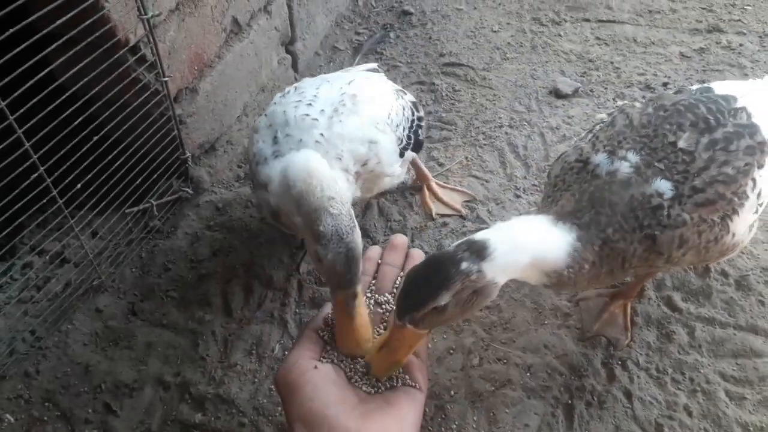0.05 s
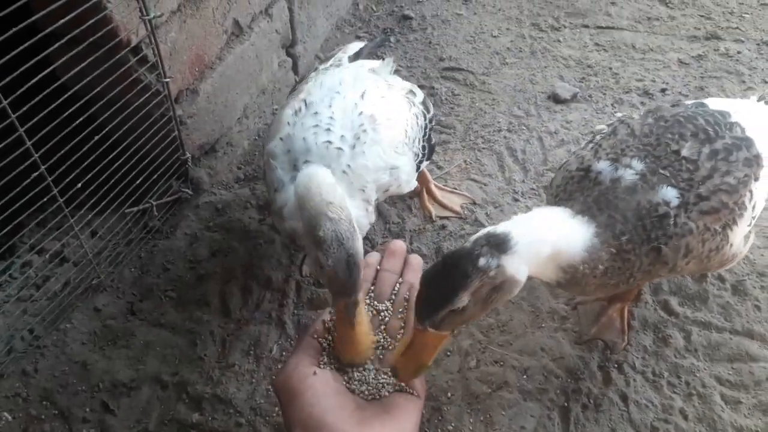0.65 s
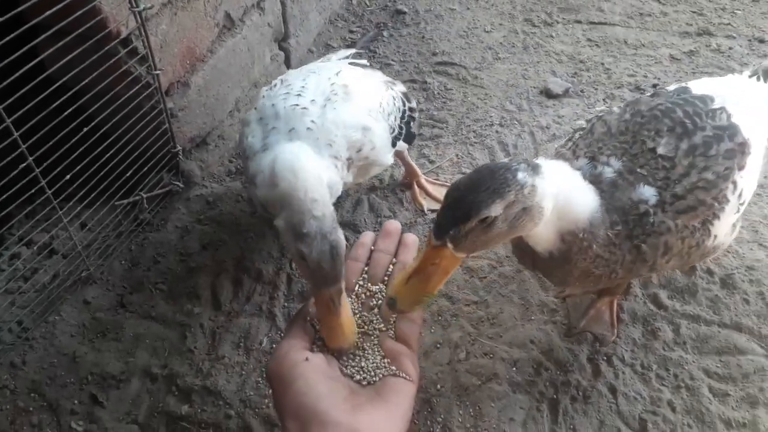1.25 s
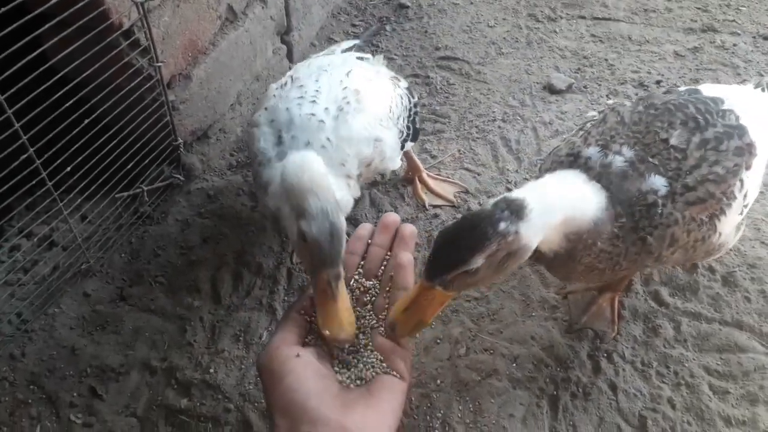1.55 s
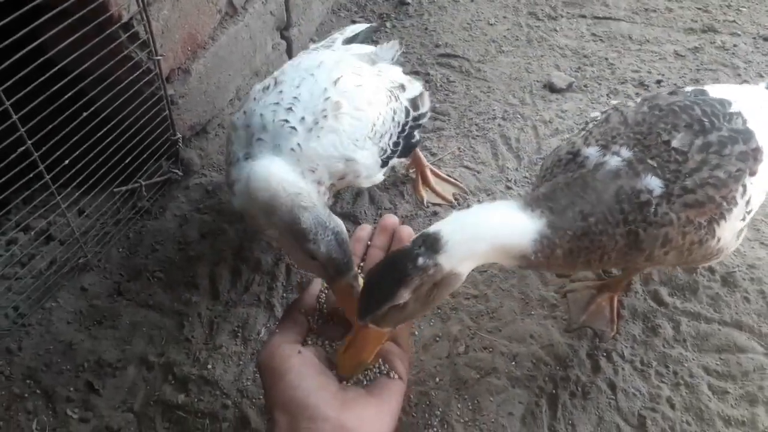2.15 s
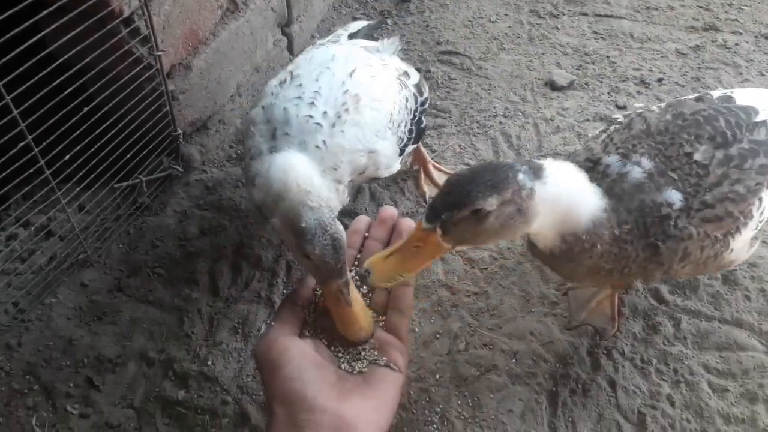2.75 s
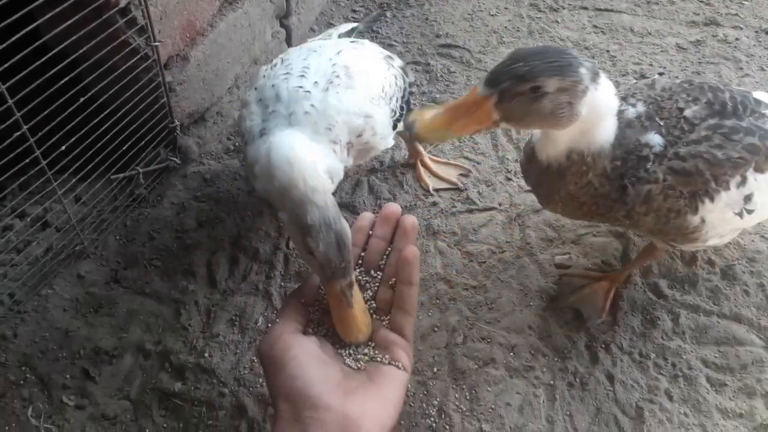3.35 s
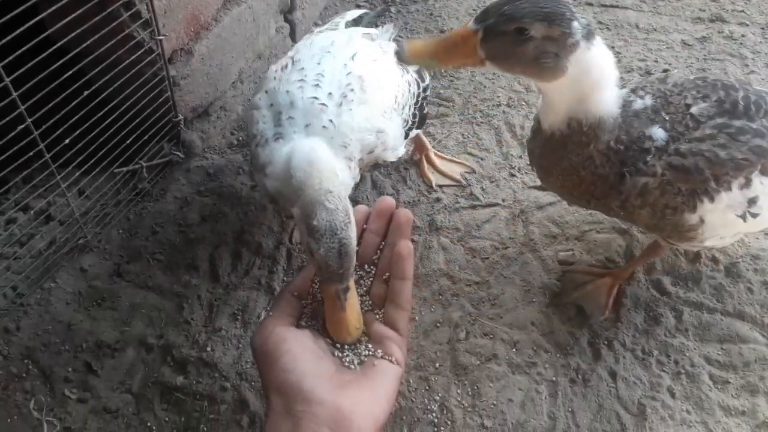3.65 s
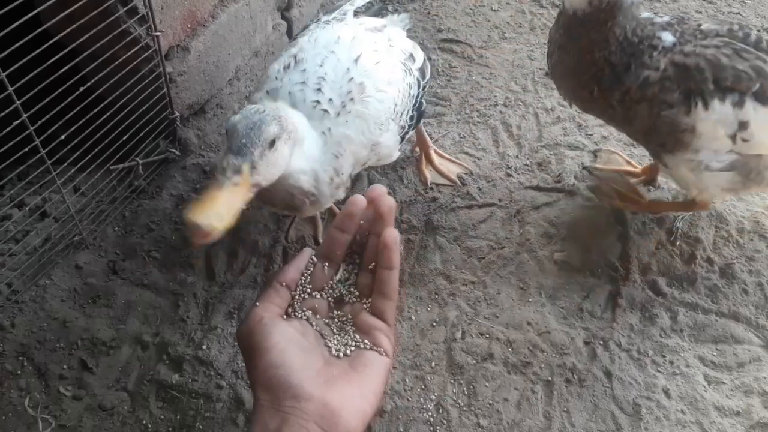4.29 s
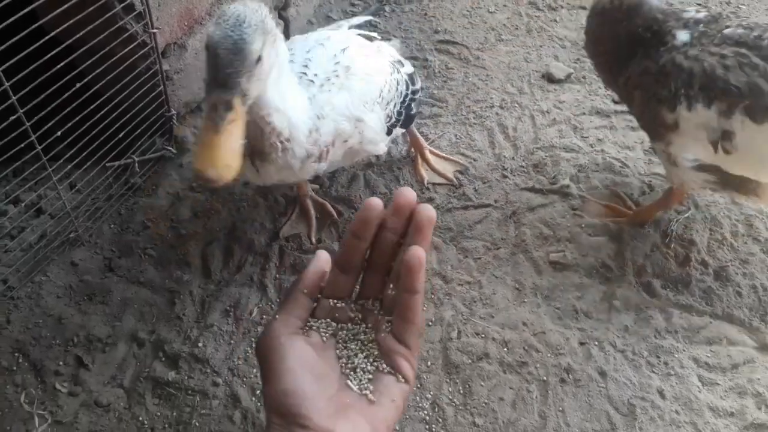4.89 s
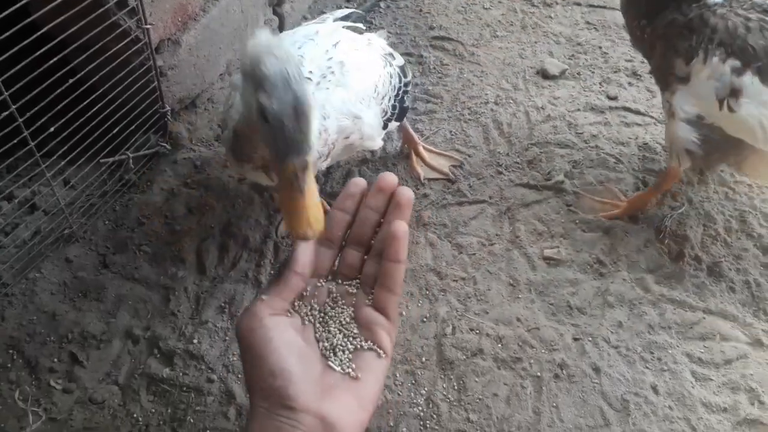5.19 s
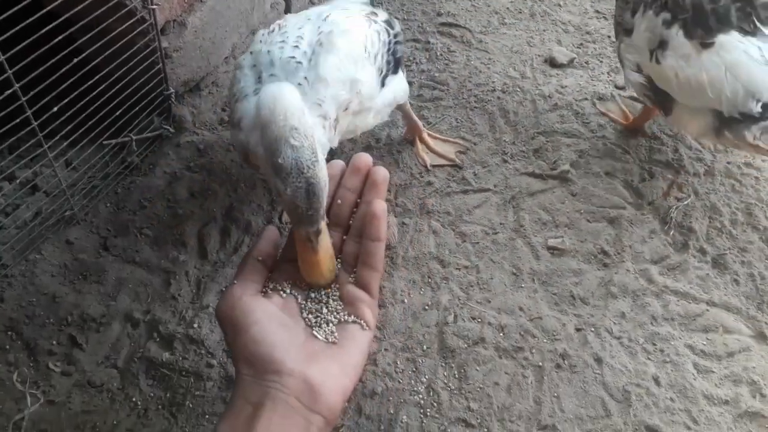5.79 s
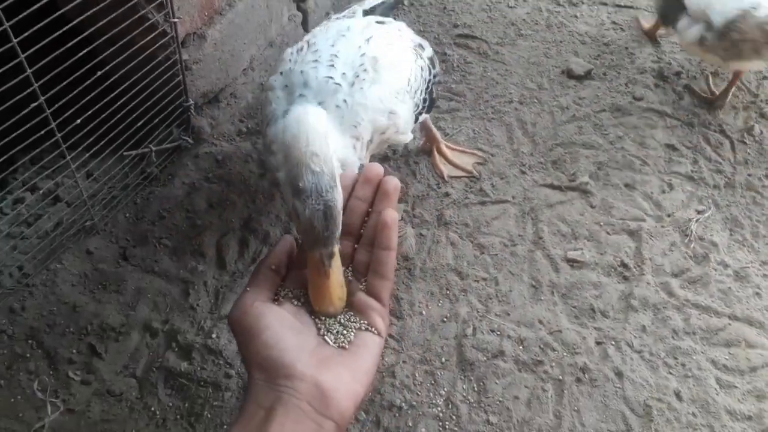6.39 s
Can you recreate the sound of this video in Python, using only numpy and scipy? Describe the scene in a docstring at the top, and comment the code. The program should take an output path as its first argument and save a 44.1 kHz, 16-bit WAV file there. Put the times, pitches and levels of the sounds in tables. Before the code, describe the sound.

Rapid, close clicks and rattles come in runs as two ducks eat seeds from a hand in a brick-walled pen. Birds add brief, hoarse, high chirps and rasping calls with a short echo, plus a few faint whistles further off. A hollow thud comes from far away. Past the middle the dabbling eases and something bumps softly nearby, then the clicking returns with a single cluck, over a faint outdoor murmur.

```python
"""Two ducks dabble grain from a palm, close by in a brick-walled pen. Their bills strike about twelve
times a second and scatter the seeds; each impact excites the resonances of the hollow bill.
Birds chirp and rasp with the two sides of the syrinx, whistle further off, and once cluck as pulses
ring the throat. Something thuds far away, something knocks close by, and the yard murmurs underneath.
The walls return short echoes."""
import sys
import numpy as np
from scipy import signal
from scipy.fft import rfft, irfft
from scipy.io import wavfile
from scipy.ndimage import uniform_filter1d, minimum_filter1d, map_coordinates

SR = 44100
rng = np.random.default_rng(int(sys.argv[2]) if len(sys.argv) > 2 else 0)


def inscribe(sig):
    """Save sig as 16-bit PCM at rate SR to the path in sys.argv[1].

    A 1-D sig is mono; a 2-D sig holds one channel per row.
    Samples are clipped to [-1, 1] before scaling.
    """
    pcm = np.round(np.clip(np.atleast_2d(sig).T, -1, 1) * 32767)
    wavfile.write(sys.argv[1], SR, pcm.astype(np.int16))


N = 283563
TIME = np.arange(N) / SR
FREQS = np.maximum(np.arange(N + 1) * SR / (2 * N), 1)


def undb(db):
    """Decibels to amplitude ratio."""
    return 10 ** (np.asarray(db) / 20)


def unit(x):
    """Normalisation to rms 1."""
    return x / np.sqrt(np.mean(x ** 2) + 1e-18)


def add(track, start_s, x):
    """Superposition: x is summed into the track from start_s."""
    i = int(np.clip(start_s * SR, 0, N - 1))
    track[i:i + len(x)] += x[:N - i]


def clock(length_s):
    """Sample times of a short event."""
    return np.arange(int(length_s * SR)) / SR


def contour(points):
    """Spectral envelope: (frequency [Hz], level [dB]) points joined on a log-frequency axis."""
    hz, db = np.transpose(points)
    return np.interp(np.log(FREQS), np.log(hz), db)


def colour(x, db):
    """Minimum-phase filter of this spectral shape, scaled so that white noise keeps its power."""
    cepstrum = irfft(np.log(unit(undb(db)) + 1e-6))
    cepstrum[1:N] *= 2
    cepstrum[N + 1:] = 0
    return irfft(rfft(x, 2 * N) * np.exp(rfft(cepstrum)))[:N]


def resonance(x, hz, width_hz):
    """Damped resonator: a two-pole band-pass."""
    quality = max(hz / width_hz, .2)
    return signal.lfilter(*signal.iirpeak(min(hz, SR * .45), quality, fs=SR), x)


def wander(size, hz):
    """Random modulation of standard deviation 1, joining hz new values a second."""
    knots = np.arange(size) * hz / SR
    values = rng.standard_normal(size // 8 + 4)
    return map_coordinates(values, [knots], order=1, mode="wrap") * np.sqrt(3 / 2)


def grains(size, per_s, spread_db):
    """Shot noise: randomly timed impulses of unequal strength, rms 1."""
    hit = rng.random(size) < per_s / SR
    sign = rng.choice([-1, 1], size)
    strength = undb(spread_db * np.minimum(rng.exponential(size=size), 4))
    return unit(hit * sign * strength)


def stirring(tilt_db_per_octave=0.7):
    """Granular noise: seeds shifting between the strokes collide in many tiny impacts."""
    # envelope of the stirring: (time [s], level [dB])
    envelope = [(0.0, -26.5), (0.43, -36), (0.61, -33.5), (1.68, -33), (1.97, -29), (2.31, -26),
                (2.36, -25), (2.49, -30.5), (2.7, -31), (3.53, -36), (3.92, -32.5), (4.15, -33.5),
                (4.53, -39.5), (5.44, -45), (5.59, -34.5), (6.11, -39), (6.43, -31.5)]
    times, db = np.transpose(envelope)
    surge_db = 2.5 * wander(N, hz=90)
    tilt_db = tilt_db_per_octave * np.log2(np.clip(FREQS, 1500, 14000))
    seeds = colour(grains(N, per_s=3000, spread_db=4.5), tilt_db)
    return seeds * undb(np.interp(TIME, times, db) + 0.5 + surge_db)


def dabbling(strokes_per_s=12.3, touch_db=3.0, spill_db=-16.5):
    """Impact excitation: the bill scoops and cracks seeds, and each contact rings its cavity modes."""
    # runs of evenly paced strokes: (first [s], last [s], level [dB], tilt [dB/octave])
    bouts = [(0.065, .625, -23.5, 1), (0.733, 1.142, -21.5, 4), (1.209, 1.732, -24.5, 1),
             (2.75, 3.062, -26, 0.5), (3.327, 3.856, -28.5, -1.5), (5.443, 5.698, -23.5, 2.5),
             (5.76, 5.991, -27.5, 2), (6.1, 6.418, -25.5, 0)]
    # hard cracks on a seed: (time [s], level [dB], tilt [dB/octave])
    snaps = [(0.067, -14, -2.5), (0.212, -15, 0), (.228, -21, 0), (.286, -14.5, 1.5), (.311, -11.5, 0.5),
             (0.39, -13.5, 3), (0.469, -10, 6), (0.477, -14, -2), (.659, -18.5, 0), (.688, -19.5, -8),
             (.808, -12, 1.5), (.902, -12, 2.5), (.981, -10.5, -0.5), (1.016, -10.5, 11),
             (1.061, -11.5, -2), (1.142, -16, -1.5), (1.153, -19.5, -3.5), (1.296, -17.5, -2),
             (1.351, -15, 9), (1.466, -17.5, 5), (1.555, -8, 3.5), (1.648, -11, 1.5), (1.691, -9, 1.5),
             (2.828, -12.5, -1), (2.923, -20.5, -3), (2.986, -17, 2), (3.026, -20, -2), (3.399, -16.5, 1),
             (3.477, -15.5, -1), (3.617, -17, 2.5), (3.783, -14, 6), (3.867, -11, 2), (4.074, -14.5, -7),
             (5.384, -21.5, 0), (5.408, -17, 0.5), (5.441, -27, 9), (5.525, -14, 5), (5.609, -11.5, 5.5),
             (5.835, -21, 0.5), (5.997, -7, 9), (6.098, -5.5, 5.5), (6.184, -14.5, 2), (6.262, -22, 0),
             (6.336, -16.5, 0.5)]
    # spectrum of bill and seeds in the palm: (frequency [Hz], level [dB])
    bill_spectrum = [(400, -72), (800, -18.5), (1050, -17), (1500, 0.5), (1900, -7), (2700, -5.5),
                     (3800, -2), (5200, -7.5), (6200, -6), (7200, -1.5), (9200, -4), (10500, -9),
                     (16000, -14)]
    # resonances of the hollow bill: (frequency [Hz], bandwidth [Hz], gain [dB])
    bill_modes = [(2010, 240, 10), (3937, 450, 8), (4730, 770, 8.5), (5300, 210, 7.5), (7870, 420, -0.5),
                  (8900, 1160, 4.5)]
    snap_rise_s, snap_decay_s = 0.0012, 0.0014
    rattle_rise_s, rattle_decay_s = 0.0058, 0.024
    track = stirring()
    # every contact is a snap of the bill plus a rattle of seeds
    contacts = [(at, db, db + spill_db, tilt) for at, db, tilt in snaps]
    for first, last, db, tilt in bouts:
        for at in np.linspace(first, last, round((last - first) * strokes_per_s) + 1):
            stroke_db = db - 0.5 * rng.standard_normal()
            contacts.append((at, stroke_db + touch_db, stroke_db, tilt))
    t = clock(.07) - .015  # zero at the contact
    size = len(t)
    before, after = np.minimum(t, 0), np.maximum(t, 0)
    snap_envelope = np.exp(before / snap_rise_s - after / snap_decay_s)
    rattle_envelope = np.exp(before / rattle_rise_s - after / rattle_decay_s)
    octaves = np.log2(np.clip(np.arange(size // 2 + 1) * SR / size, 1500, 14000) / 5500)
    for at, snap_db, rattle_db, tilt in contacts:
        snap = unit(rng.standard_normal(size) * snap_envelope) * np.sqrt(0.0015 * SR / size)
        rattle = grains(size, per_s=8000, spread_db=2.4) * rattle_envelope
        impact = undb(snap_db) * snap + undb(rattle_db) * rattle
        spot_db = 3 * wander(len(octaves), hz=700)  # each spot struck has its own colour
        response = unit(undb(tilt * octaves + spot_db))
        add(track, at + t[0], irfft(rfft(impact) * response, size))
    cavity_db = sum(db / (1 + (2 * (FREQS - hz) / width) ** 2) for hz, width, db in bill_modes)
    return colour(track, contour(bill_spectrum) + cavity_db)


def yard(hum_hz=122):
    """Ambient noise: a low broadband murmur and a hum, both randomly modulated."""
    # murmur spectrum ahead of the treble roll-off: (frequency [Hz], level [dB])
    spectrum = [(20, -82), (32, -18), (48, -1), (70, -10.5), (125, 5), (240, -9), (450, -10.5),
                (620, -13.5), (850, -7), (1100, -13.5), (1900, 0.5), (2700, -14), (6000, -35), (9000, -16),
                (16000, -13)]
    rolloff_db = 4 * np.log2(np.maximum(FREQS / 2500, 1))
    murmur = colour(rng.standard_normal(N), contour(spectrum) - rolloff_db)
    phase = 2 * np.pi * np.cumsum(hum_hz + 5 * wander(N, hz=24.34)) / SR
    hum = np.sin(phase) * undb(wander(N, hz=9.1))
    return undb(-39.5 + 0.85 * wander(N, hz=2.47)) * murmur + undb(-49.5) * hum


def chirps(fall_octaves_per_s=5.3, jitter=.06, hoarse_db=-11, second_ratio=1.36, second_db=-7):
    """Biphonation: each side of the syrinx sings a falling note; fast modulation makes them hoarse."""
    # hoarse chirps: (time [s], duration [s], starting pitch [Hz], level [dB])
    notes = [(0.063, 0.054, 3815, -27.5), (0.149, 0.032, 3240, -34), (0.466, 0.036, 3350, -31.5),
             (0.541, 0.027, 2680, -29.5), (1.031, 0.021, 3650, -31.5), (1.064, 0.036, 2680, -24.5),
             (1.068, 0.03, 5380, -20.5), (1.349, 0.061, 3015, -39.5), (1.803, 0.076, 2530, -28),
             (1.911, 0.026, 3830, -15.5), (2.006, 0.061, 2640, -28.5), (2.072, 0.055, 2684, -26.5),
             (2.832, 0.053, 2820, -32), (2.89, 0.056, 2650, -33.5), (3.075, 0.068, 2432, -29.5),
             (3.133, 0.037, 3470, -26), (3.542, 0.053, 3526, -34), (3.785, 0.06, 2580, -27),
             (3.827, 0.026, 4010, -19), (3.963, 0.033, 2670, -25.5), (4.137, .037, 5900, -16.5),
             (4.229, 0.042, 1970, -23), (4.427, 0.039, 4580, -16.5), (4.448, 0.086, 2160, -32),
             (4.623, 0.0089, 4170, -21.5), (4.724, 0.065, 2400, -28.5), (4.746, 0.1, 3360, -32),
             (4.852, .027, 2890, -22.5), (4.862, 0.04, 3850, -22), (4.925, 0.052, 2710, -23),
             (5.14, 0.013, 4170, -16.5), (5.571, 0.03, 2175, -36.5), (5.625, 0.042, 2806, -30),
             (5.677, 0.029, 3110, -29), (5.964, 0.048, 3563, -33)]
    equal_hz, overtone_db_per_octave = 2454, -44  # overtone equals the note here, fades for higher notes
    track = np.zeros(N)
    for start, length, hz, db in notes:
        t = clock(length)
        pitch = hz * 2 ** (-fall_octaves_per_s * t) * (1 + jitter * wander(len(t), hz=915))
        phase = 2 * np.pi * np.cumsum(pitch) / SR
        flutter = undb(2.0 * wander(len(t), hz=410))
        hoarseness = 1 + undb(hoarse_db) * wander(len(t), hz=2127)
        overtone_db = overtone_db_per_octave * np.log2(hz / equal_hz)
        first_side = np.sin(phase) + undb(overtone_db) * np.sin(2 * phase)
        second_side = undb(second_db + min(overtone_db, 0) / 2) * np.sin(second_ratio * phase)
        envelope = np.sin(np.pi * t / length) ** 0.24
        note = (first_side + second_side) * flutter * hoarseness * envelope
        add(track, start, undb(db) * unit(note))
    return track


def rasps(release_s=0.018, jitter=0.0435, fall=.12, air_db=-1):
    """Source and filter: both sides of the syrinx flap unsteadily in rushing air, shaped by the throat."""
    # harsh calls: (time [s], duration [s], rise time [s], level [dB])
    calls = [(0.673, 0.039, 0.016, -19), (1.529, 0.066, 0.012, -28.5), (1.893, 0.053, 0.0047, -19),
             (2.02, 0.052, .032, -18.5), (2.137, 0.083, 0.036, -12.5), (2.28, 0.056, 0.031, -11.5),
             (2.354, 0.041, 0.0068, -22.5), (2.438, 0.055, 0.006, -9), (2.633, 0.084, 0.043, -29.5),
             (3.169, 0.036, 0.02, -8), (3.673, 0.06, 0.029, -18), (3.816, 0.04, .01, -19.5),
             (3.953, 0.059, 0.076, -14), (4.106, .062, 0.041, -13), (4.271, 0.047, .035, -28),
             (4.356, 0.034, 0.0096, -24), (4.441, 0.022, 0.013, -21.5), (4.568, 0.014, 0.026, -27),
             (4.75, 0.038, 0.019, -29), (4.814, 0.097, 0.016, -31.5), (4.919, 0.029, 0.0091, -21),
             (5.042, .066, 0.032, -10.5), (5.134, 0.021, 0.043, -15), (5.248, 0.037, 0.027, -21.5),
             (5.688, 0.08, 0.0053, -28)]
    # spectral envelope common to the calls: (frequency [Hz], level [dB])
    spectrum = [(470, -115), (800, -46), (1080, 7), (1780, -5.5), (2150, -7), (2380, -6.5), (2800, -6),
                (3980, -7), (4340, -7), (6650, -9), (7830, -10), (9100, -7), (10400, -15), (16000, -15.5)]
    loud_throat_hz, db_per_octave = 7130, 23.5  # softer calls have a lower throat resonance
    track, t = np.zeros(N), clock(.25)
    for start, length, rise, db in calls:
        tones = 0
        for side_hz in (1900, 2350):
            start_hz = side_hz * (1 + 0.055 * rng.standard_normal())
            pitch = start_hz * np.exp(-fall * t / length + jitter * wander(len(t), hz=595.8))
            phase = 2 * np.pi * np.cumsum(pitch) / SR
            tones += sum(np.sin(k * phase) * undb(4.5 * wander(len(t), hz=162)) for k in range(1, 5))
        source = unit(tones) + undb(air_db) * rng.standard_normal(len(t))
        throat_hz = loud_throat_hz * 2 ** (db / db_per_octave)
        voice = resonance(source, throat_hz, throat_hz * 0.83)
        # a tighter throat also sheds the low partials
        voice = signal.sosfilt(signal.butter(3, throat_hz * 0.48, "high", fs=SR, output="sos"), voice)
        flutter = undb(2.04 * wander(len(t), hz=326))
        effort = np.minimum(t / rise, 1) ** 0.44 * np.exp(-np.maximum(t - length, 0) / release_s)
        add(track, start, undb(db - 2.5) * effort * unit(voice * flutter))
    return colour(track, contour(spectrum))


def whistles(jitter=0.008):
    """Nearly pure tones of a bird further off, wavering by slight frequency and amplitude modulation."""
    # thin whistles: (time [s], duration [s], pitch [Hz], level [dB])
    notes = [(.82, .18, 1860, -37), (1.07, .08, 1800, -40), (3.27, .27, 1790, -40.5)]
    track = np.zeros(N)
    for start, length, hz, db in notes:
        t = clock(length)
        phase = 2 * np.pi * np.cumsum(hz * (1 + jitter * wander(len(t), hz=248))) / SR
        flutter = undb(1.6 * wander(len(t), hz=59))
        envelope = np.sqrt(np.sin(np.pi * t / length))
        add(track, start, undb(db) * unit(np.sin(phase) * flutter * envelope))
    return track


def thud(start_s=1.19, attack_s=0.036, hold_s=0.046, ring_hz=243, db=-29):
    """Double-slope decay: a far, hollow bang rings on one low note, drops fast and rolls away faintly."""
    # spectrum of the rumble: (frequency [Hz], level [dB])
    spectrum = [(60, -39), (140, -9.5), (240, -4), (330, -12), (450, -12), (680, -23.5), (810, -13),
                (950, -29), (1300, -15.5), (2500, -45)]
    fall_db_per_s, roll_db, roll_db_per_s = 48, -36, 24
    age = TIME - start_s
    fading_s = np.maximum(age - attack_s - hold_s, 0)
    attack = np.clip(age / attack_s, 0, 1) ** 2
    decay = undb(-fall_db_per_s * fading_s) + undb(roll_db - roll_db_per_s * fading_s)
    rumble = colour(rng.standard_normal(N), contour(spectrum))
    phase = 2 * np.pi * np.cumsum(ring_hz + 11 * wander(N, hz=59.4)) / SR
    ring = np.sin(phase) * undb(2 * wander(N, hz=41.1))
    return undb(db) * (rumble + ring) * attack * decay


def knock(start_s=4.351, upper_hz=680, lower_hz=150, swing_db=-4, clatter_db=-24):
    """Heavily damped oscillation: a soft, close bump swings two modes and leaves a low clatter."""
    track, t = np.zeros(N), clock(.25)
    swing = np.sin(2 * np.pi * upper_hz * t) * np.exp(-t / 0.0018)
    swing += 0.47 * np.sin(2 * np.pi * lower_hz * t) * np.exp(-t / 0.0041)
    noise = resonance(rng.standard_normal(len(t)), hz=380, width_hz=570)
    clatter = unit(resonance(noise, hz=350, width_hz=730)) * np.exp(-t / 0.055)
    add(track, start_s, undb(swing_db) * swing + undb(clatter_db) * clatter)
    return signal.sosfilt(signal.butter(3, 130, "high", fs=SR, output="sos"), track)


def cluck(ring_s=0.0011, closing_s=.004):
    """Pulse-excited formant: pulses quicken and slow again, each ringing one throat resonance."""
    # course of the cluck: (time [s], pulse rate [Hz], throat resonance [Hz], level [dB])
    course = [(6.001, 179, 1210, -20), (6.012, 234, 1140, -23), (6.02, 308, 1220, -24),
              (6.031, 367, 1440, -21.5), (6.045, 322, 1220, -22), (6.053, 276, 1140, -21)]
    times, *columns = np.transpose(course)
    t = times[0] + clock(times[-1] - times[0])
    pulse_hz, throat_hz, db = (np.interp(t, times, column) for column in columns)
    pulse_age = np.cumsum(pulse_hz) / SR % 1 / pulse_hz
    pulses = np.sin(2 * np.pi * throat_hz * pulse_age) * np.exp(-pulse_age / ring_s)
    voice = resonance(pulses, hz=1230, width_hz=570)
    voice = resonance(voice, hz=650, width_hz=1200)
    closing = np.minimum((t[-1] - t) / closing_s, 1)
    track = np.zeros(N)
    add(track, times[0], unit(voice) * undb(db) * closing)
    return track


def pen(x, t60_s=0.22, gap_s=.003):
    """Reverberation: brick walls and ground return a decaying scatter of echoes, dull at the top."""
    t = clock(.5)
    decay = np.exp(-np.log(1000) * t / t60_s) * (t > gap_s)
    reflections = grains(len(t), per_s=970, spread_db=1.0) * decay
    response = resonance(reflections, hz=1700, width_hz=6900)
    return signal.fftconvolve(x, response / np.sqrt(np.sum(response ** 2)))[:N]


def scene():
    """Direct-to-reverberant ratio sets distance: the bills are close, the calls further into the pen."""
    bills, harsh, notes, call, bump = dabbling(), rasps(), chirps() + whistles(), cluck(), knock()
    direct = bills + harsh + notes + call + bump
    echoes = pen(undb(-19) * bills + undb(-5.5) * harsh + undb(-4) * notes
                 + undb(-12.5) * call + undb(-18) * bump)
    return (direct + echoes + thud() + yard())[None]


def record(dry):
    """Peak limiting: a fast gain dip catches the highest peaks, then a low-pass cuts the top."""
    window_samples, cutoff_hz = 25, 15900
    allowed_gain = np.minimum(1 / (np.abs(dry) + 1e-9), 1)
    gain = uniform_filter1d(minimum_filter1d(allowed_gain, window_samples), window_samples)
    return signal.sosfilt(signal.ellip(10, .2, 70, cutoff_hz, fs=SR, output="sos"), dry * gain)


dry = scene()
out = record(dry)
inscribe(out)
```